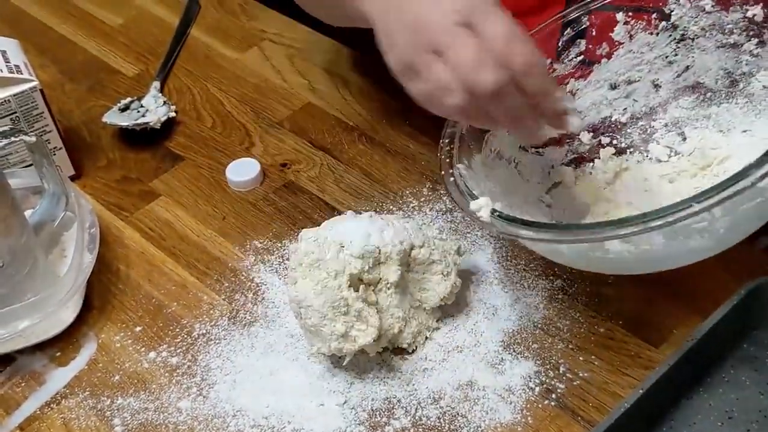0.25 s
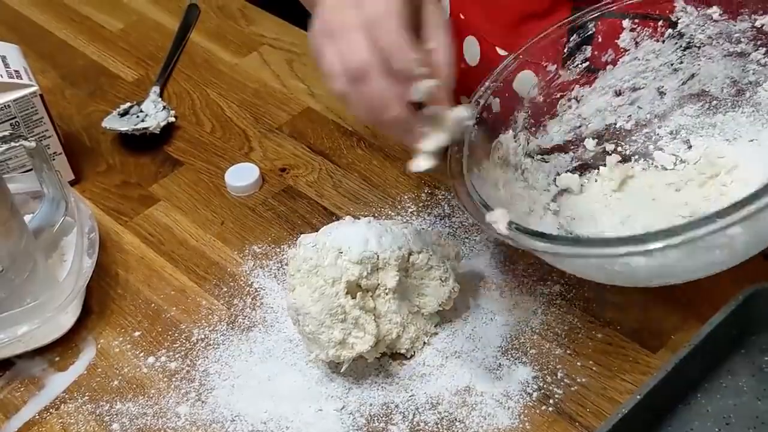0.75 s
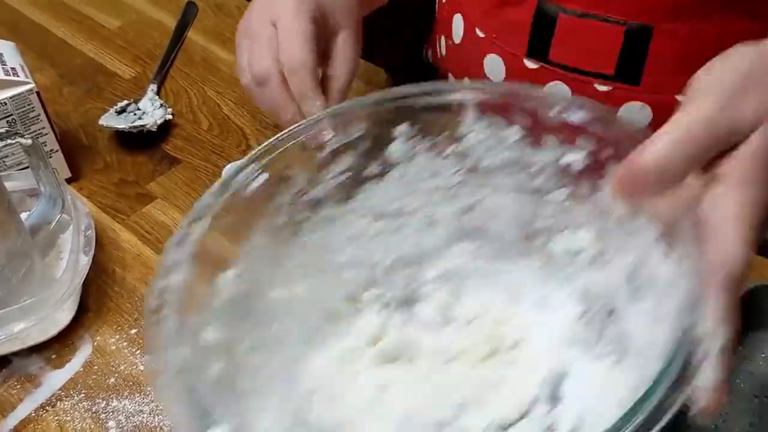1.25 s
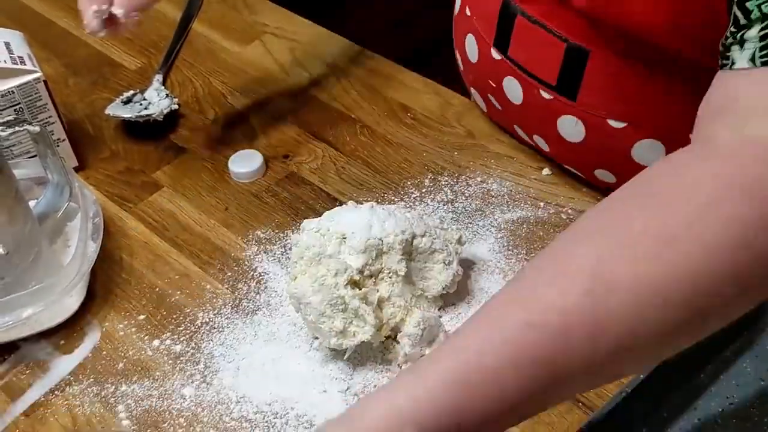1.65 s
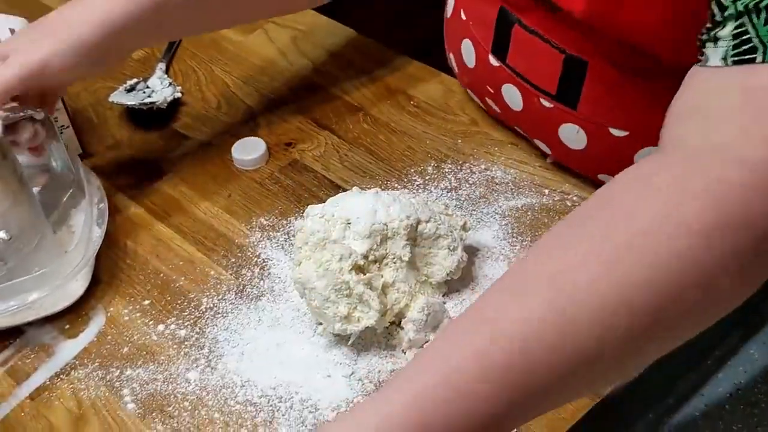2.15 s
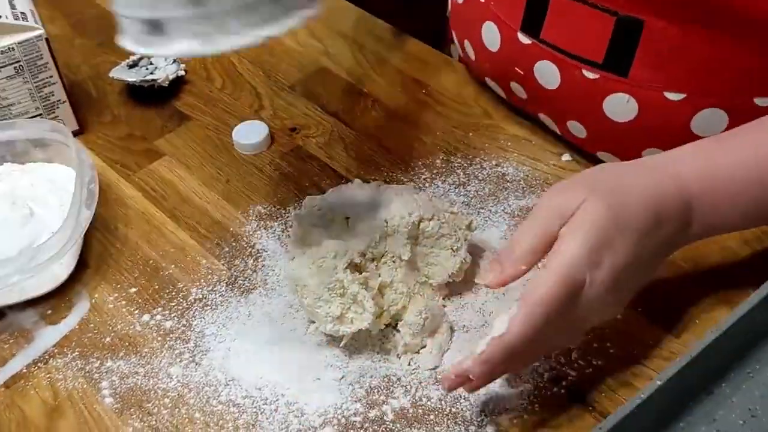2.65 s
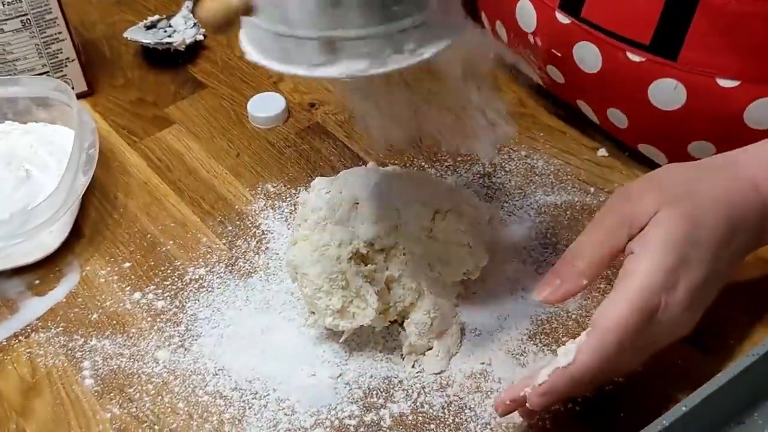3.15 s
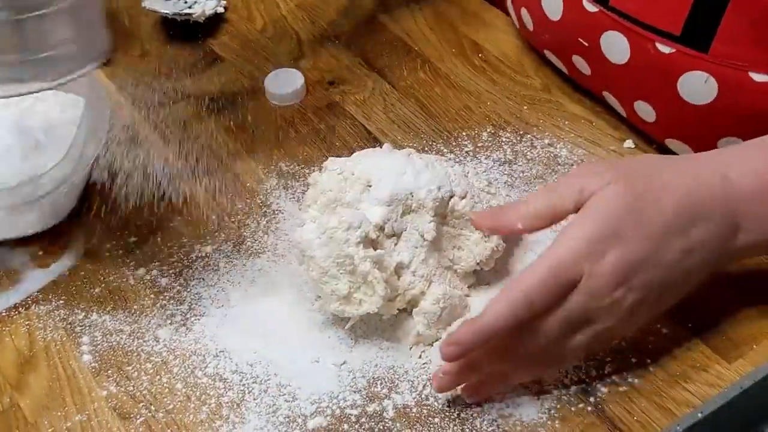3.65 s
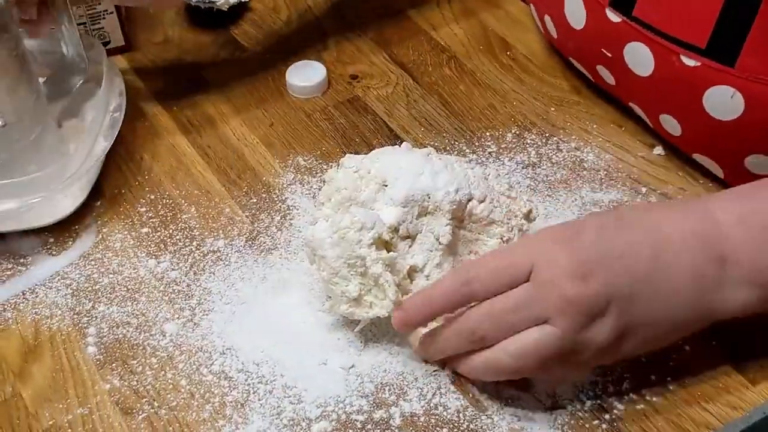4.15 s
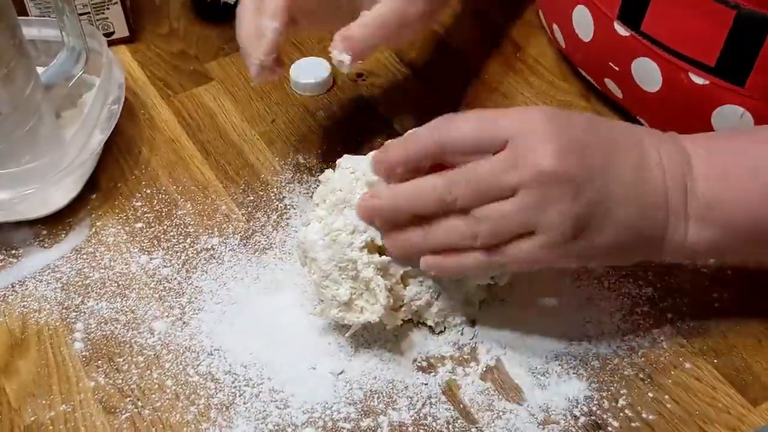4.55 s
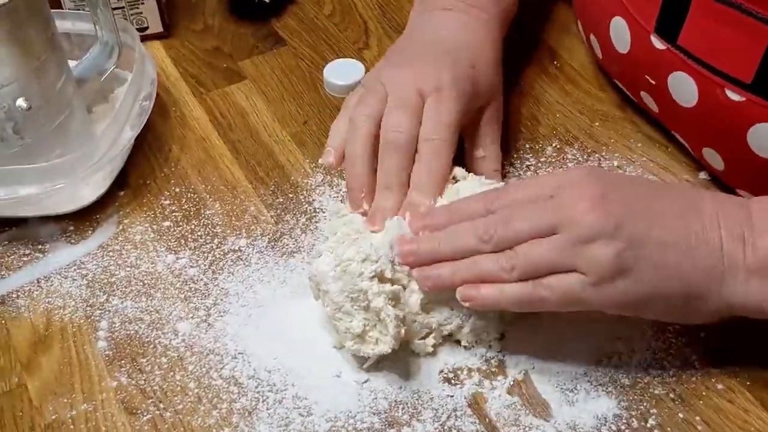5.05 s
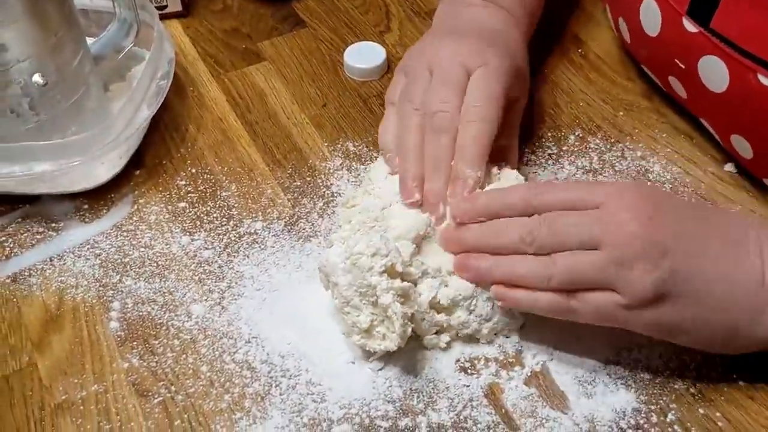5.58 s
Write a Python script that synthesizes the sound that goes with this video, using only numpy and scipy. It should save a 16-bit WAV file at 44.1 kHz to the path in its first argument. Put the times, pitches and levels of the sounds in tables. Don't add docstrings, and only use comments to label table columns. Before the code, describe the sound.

After nearly two seconds of low fridge hum, a heavy bowl thumps wood three times, a metal sifter rattles and lands, then soft dough work.

```python
import sys
import numpy as np
from scipy import signal
from scipy.fft import rfft, irfft, next_fast_len
from scipy.io import wavfile
from scipy.ndimage import uniform_filter1d, map_coordinates

SR = 44100
rng = np.random.default_rng(int(sys.argv[2]) if len(sys.argv) > 2 else 0)


def unload_audio(sound):
    columns = np.transpose(np.atleast_2d(sound))
    steps = np.round(np.clip(columns, -1, 1) * 32767)
    wavfile.write(sys.argv[1], SR, steps.astype(np.int16))


def elevation(decibels):
    levels = np.asarray(decibels, float)
    return 10 ** (levels / 20)


N = 256662

# frequency_hz, left_minus_right_db
BOWL_SIDE = [(250, -0.5), (500, 3.5), (1000, 0.5), (2000, -4.5), (4000, 0), (12000, 3.5)]


def bowl():
    # start_s, peak_db, brightness_db, foot_bounce_hz, bounce_db
    knocks = [
        (1.8818, 9, 1, 352, -1.5),
        (2.0339, 4.5, -2.5, 376, -5),
        (2.1299, 9, -3, 619.6, -6.5),
    ]
    # frequency_hz, level_db
    knock_colour = [(30, -55), (60, -21.5), (100, -14), (180, -6.5), (350, -4.5), (700, -9), (1200, -14),
                    (2000, -22.5), (3200, -32), (5000, -53), (8000, -56.5), (16000, -78)]
    # frequency_hz, level_db, t60_s
    counter = [(107.3, -9, 0.71), (135.5, -9, 0.59), (178.6, 0.5, 0.55), (247.8, -12, 0.76),
               (348.2, 5, 0.39), (448, -13, 0.52), (536, -6, 0.47), (633, -8, 0.46), (740, -10, 0.46),
               (791.7, -5, 0.27)]
    # frequency_hz, level_db, t60_s
    glass = [(5900, -67, .3), (7400, -63, .3)]
    t = np.arange(SR // 2) / SR
    out = np.zeros((2, N))
    for s, db, bright_db, foot_hz, foot_db in knocks:
        thud = elevation(foot_db - 60 * t / 0.042) * (1 - np.exp(-t / 0.0012)) * np.sin(2 * np.pi * foot_hz * t)
        ring = ringing(counter, t, uneven_db=2.2, rate=25)
        bowl_ring = ringing(glass, t, uneven_db=4, rate=60)
        tick = elevation(-43 + bright_db - 60 * t / 0.029) * rng.standard_normal(len(t))
        knock = blow(knock_colour, bright_db, length_s=0.0076, push=12)
        knock = np.pad(knock, (0, SR))[:len(t)]
        near = elevation(-21.5) * ring + bowl_ring + tick - thud - 0.27 * knock
        add(out, elevation(db) * knock, s, room_db=4.5, near=elevation(db) * near)
    out = filtered(out, lambda hz: (1j * hz / (1j * hz + 60)) ** 2)
    return ports(out, BOWL_SIDE)


def ringing(modes, t, uneven_db, rate):
    total = np.zeros(len(t))
    for hz, db, t60 in modes:
        level_db = db - 60 * t / t60 + uneven_db * wobble(rate, count=len(t))
        total += elevation(level_db) * np.sin(2 * np.pi * hz * t)
    return total


def blow(colour, bright_db, length_s, push):
    t = np.arange(SR // 4) / SR
    x = rng.standard_normal(len(t)) * elevation(-60 * t / length_s) * (1 - np.exp(-t / 0.00029))
    x[round(.0008 * SR)] -= push
    tilt = [(1000, 0.003), (8000, bright_db)]
    x = filtered(x, lambda hz: causal(elevation(along(colour, hz) + along(tilt, hz))))
    return x / np.abs(x).max()


def sifter():
    # start_s, peak_db, brightness_db, rebound_db (unheard),
    # favoured_mode_hz
    drags = [
        (2.803, -18, -11.5, -22, 4584),
        (2.852, -14.5, -11.5, -10.5, 3380),
        (2.953, -17.5, -14, -11, 3110),
        (3.186, -23.5, -21.5, -11.5, 2334),
        (3.674, -32.5, -16, -7, 1950),
        (3.477, -27.5, -26, -6.5, 4780),
        (3.57, -28.5, -15.5, -25, 1960),
    ]
    # start_s, peak_db, brightness_db, rebound_db (unheard),
    # favoured_mode_hz
    flicks = [(2.747, -43.5, -13.5, -22, 4482), (2.82, -34.5, -14.5, -15, 4600),
              (2.944, -29, -18.5, -14, 4550), (3.073, -34, -25.5, -19, 2090),
              (3.09, -29.5, -34, -18.5, 2060), (3.104, -30, -18.5, -21, 2090),
              (3.262, -17, -13.5, -9, 3080), (3.286, -28.5, -17.5, -2, 2987),
              (3.635, -25, -20.5, -4.5, 1930), (3.386, -26.5, -21.5, -2, 3630),
              (3.176, -32, -17.5, -4, 2406), (3.274, -25.5, -13, -3, 4970), (3.487, -28, -19.5, -9, 2007),
              (3.829, -25, -15.5, -35.5, 4450), (3.872, -38.5, -24, -19.5, 1960),
              (3.923, -32, -18.5, -11, 2042), (4.001, -40, -21, -18.5, 5120)]
    # start_s, peak_db, brightness_db, room_db
    landing = [
        (4.184, -14.5, 5, 2),
        (4.206, -16, 0, 6.5),
        (4.229, -9.5, 0, -7.5),
        (4.243, -22.5, -15.5, -1),
        (4.379, -41.5, 2, 8.5),
    ]
    # frequency_hz, level_db
    landing_colour = [(150, -36), (250, -4.5), (468, -11.5), (519, -7.5), (748, -3), (1020, -11.5),
                      (1200, -5), (1350, -13), (3230, -14.5), (16000, -39)]
    # frequency_hz, left_minus_right_db
    tin_side = [(500, -0.5), (1000, -0.5), (2000, -12.5), (4000, -4.5), (8000, 4.5), (12000, 1.5)]
    lead_s = .007
    strike_rattle_s = 0.037
    flight_s, flight_s_per_db = 0.0071, 1.3
    t = np.arange(SR // 8) / SR - lead_s
    out = np.zeros((2, N))
    dragged = contact(t + lead_s, -8.5, rattle_s=0.038, rise_s=0.0023)
    dragged = dragged + contact(t, 0, strike_rattle_s, rise_s=.0017)
    flicked = contact(t, 0, strike_rattle_s, rise_s=0.00037)
    strikes = [(dragged, row) for row in drags] + [(flicked, row) for row in flicks]
    for strike, (s, db, bright_db, rebound_db, grip_hz) in strikes:
        since_rebound = t - flight_s + flight_s_per_db * rebound_db
        rebound = contact(since_rebound, rebound_db, rattle_s=0.12, rise_s=0.0011)
        x = tinned(strike, grip_hz, bright_db) + tinned(rebound, 2020, bright_db + 3)
        add(out, elevation(db) * x / np.abs(x).max(), s - lead_s, room_db=-6.0)
    for s, db, bright_db, room_db in landing:
        add(out, elevation(db) * blow(landing_colour, bright_db, length_s=0.0222, push=2.8), s, room_db)
    return ports(out, tin_side)


def contact(t, db, rattle_s, rise_s):
    after = np.maximum(t, 0)
    return elevation(db - 60 * after / max(rattle_s, .004)) * (1 - np.exp(-after / max(rise_s, .0002)))


def tinned(envelope, grip_hz, bright_db):
    # frequency_hz, width_hz, level_db
    tin_modes = [(930, 126.5, 4.5), (2011, 87, -0.5), (3005, 240, 0), (3600, 35, -11.5), (4540, 260, 3),
                 (5740, 110, -40.5), (7020, 220, 1), (9020, 65, 1)]
    # frequency_hz, level_db
    tin_colour = [(290, -53), (500, -18), (933, -9.5), (1400, -4.5), (2010, -5), (2460, -6), (3060, -3),
                  (5550, -14.5), (14700, -18.5), (16000, -32)]
    modes = tin_modes + np.outer(rng.normal(-3, 3, len(tin_modes)), [0, 0, 1])
    modes = np.vstack([modes, (grip_hz, 130, 3)])
    tilt = [(4500, 0), (7000, bright_db + 19.0)]

    def tin(hz):
        peaks = sum(elevation(level + 4.0) / (1 + ((hz - c) / w) ** 2) for c, w, level in modes)
        return elevation(along(tin_colour, hz)) * (1 + peaks)

    grit = elevation(3.3 * rng.standard_normal(len(envelope) // 20 + 1)).repeat(20)[:len(envelope)]
    x = rng.standard_normal(len(envelope)) * grit * envelope
    return filtered(x, lambda hz: causal(tin(hz) * elevation(along(tilt, hz))))


def board():
    # start_s, level_db, pitch_hz, t60_s
    pushes = [(4.187, -15.5, 183.6, 0.12), (4.203, -16.5, 136, 0.12), (4.24, -11.5, 146, 0.059),
              (4.26, -28.5, 95, 0.17), (4.19, -28.5, 270, 0.14), (4.232, -35.5, 620, 0.0594),
              (2.9, -54.5, 80, 0.14), (1.4, -48.5, 230, 0.32), (1.56, -53, 110, 0.12),
              (2.1, -36.5, 410, .03), (2.84, -40, 250, 0.17), (5.58, -39.5, 105, 0.053),
              (5.689, -39, 100, 0.184), (5.66, -47.5, 92, 0.17), (3.7, -54, 500, 0.26)]
    t = np.arange(SR // 2) / SR
    out = np.zeros((2, N))
    for s, db, hz, t60 in pushes:
        envelope = elevation(db - 60 * t / t60) * (1 - np.exp(-t / 0.0023))
        add(out, envelope * np.sin(2 * np.pi * hz * t), s, room_db=-13)
    return ports(out, BOWL_SIDE)


def palms():
    # start_s, length_s, level_db
    strokes = [
        (4.33, 0.56, -60.5),
        (4.58, 0.418, -68),
        (5.73, 0.11, -57.5),
        (5.76, 0.12, -53),
    ]
    # frequency_hz, level_db
    rub_colour = [(300, -44), (700, -3), (950, -3), (1500, -7.5), (2200, -6.5), (3500, -13.5), (4300, -15),
                  (6500, -26.5), (16000, -27)]
    return swells(strokes, rise=0.13) * elevation(2 * wobble(70)) * rush(rub_colour, patchy_db=1.5)


def kitchen():
    # time_s, lift_db
    settle = [(0, 2.8), (.45, 1.5), (.95, 5), (1.85, 6.5), (2.6, 9), (3.8, 10), (4.1, 8.5), (4.4, 10.5),
              (5.82, 10.5)]
    # start_s, length_s, level_db
    stirs = [
        (1.25, 1.8, -74),
        (2.62, 1.9, -64.5),
        (4.25, 0.68, -66.5),
    ]
    # frequency_hz, level_db
    fridge = [(108, -69), (142, -73), (240, -71), (320, -67), (360, -70), (398, -80), (480, -81),
              (530, -80), (671, -81)]
    # frequency_hz, level_db
    rumble_colour = [(5, -7.5), (50, -1), (100, -1.5), (200, -4), (235, -8.5), (260, -13), (330, -7.5),
                     (400, -11), (580, -14), (780, -13), (900, -16), (1300, -37), (2200, -120)]
    # frequency_hz, level_db
    air_colour = [(350, -15), (600, -23), (815, -11), (1210, -10.5), (2060, -9.5), (5850, -23),
                  (9000, -30.5), (11700, -62), (19800, -120)]
    # frequency_hz, level_db
    hiss_colour = [(3530, -40.5), (6000, -33), (7080, -3), (7950, -15), (9940, -3), (11900, 3.5),
                   (13300, -2.5), (15500, -7), (16100, -31.5)]
    rumble_db, air_db, hiss_db = -65, -76.5, -77
    t = np.arange(N) / SR
    up_db = np.interp(t, *np.transpose(settle))
    stir = swells(stirs, rise=.15)
    hum = np.zeros(N)
    for hz, db in fridge:
        hum += elevation(db - 1 + 2 * wobble(5)) * np.sin(2 * np.pi * hz * t + .8 * wobble(5))
    hum *= elevation((rumble_db + up_db + 61) / 2)
    rumble = elevation(rumble_db + up_db + 0.69 * wobble(3.1)) * rush(rumble_colour, patchy_db=1.4)
    hiss_level = np.hypot(elevation(hiss_db + 0.33 * up_db), elevation(-8.5) * stir)
    hiss = hiss_level * elevation(2.5) * rush(hiss_colour, patchy_db=1.5)
    air_level = np.hypot(elevation(air_db + 0.49 * up_db), stir)
    air = air_level * elevation(5.5) * rush(air_colour, patchy_db=1)
    return rumble + hum + air + hiss


def swells(rows, rise):
    u = np.array([(np.arange(N) / SR - s) / length for s, length, db in rows])
    shape = np.clip(np.minimum(u / rise, (1 - u) / (1 - rise)), 0, 1)
    power = elevation(np.array(rows)[:, 2]) ** 2
    return np.sqrt(power @ np.sin(np.pi / 2 * shape) ** 2)


def rush(spectrum, patchy_db):
    z = signal.stft(rng.standard_normal((2, N)), nperseg=512)[2]
    field = uniform_filter1d(rng.standard_normal(z.shape[1:]), size=6, axis=0)
    field = uniform_filter1d(field, size=14, axis=1)
    pair = signal.istft(z * elevation(patchy_db * unit(field)), nperseg=512)[1][:, :N]
    pair = ports(diffuse(pair), [(100, 0.45), (5000, 0.32)])
    return unit(filtered(pair, lambda hz: elevation(along(spectrum, hz))))


def add(out, x, s, room_db, near=0):
    # frequency_hz, t60_s
    room_decay = [(100, 0.51), (300, 0.4), (1000, 0.36), (3000, 0.37), (6000, 0.324), (12000, 0.3906)]
    tail_s = .4
    noise = diffuse(rng.standard_normal((2, round(tail_s * SR))))
    hz, t, z = signal.stft(noise, SR, nperseg=256)
    tail = signal.istft(z * elevation(-60 * t / along(room_decay, hz)[:, None]), SR, nperseg=256)[1]
    tail = np.pad(tail / np.linalg.norm(tail[0]), ((0, 0), (round(.002 * SR), 0)))
    wet = elevation(room_db) * signal.fftconvolve(x[None], tail, axes=1)
    wet[:, :len(x)] += x + near
    start = round(s * SR)
    out[:, start:start + wet.shape[1]] += wet[:, :N - start]


def diffuse(pair):
    # frequency_hz, likeness (0-1)
    alike = [(60, 0.63), (250, 0.97), (500, 0.74), (1000, 0.618), (2000, 0.21), (8000, 0.033)]

    def mid_side(hz):
        turn = np.arccos(np.clip(along(alike, hz), 0, 1)) / 2
        return np.array([np.cos(turn), np.sin(turn)])

    mid, side = filtered(pair, mid_side)
    return np.array([mid + side, mid - side])


def ports(pair, side):
    lead_s = 0.0002008
    turn = np.array([[.5], [-.5]])
    return filtered(pair, lambda hz: elevation(turn * along(side, hz)) * np.exp(2j * np.pi * hz * turn * lead_s))


def unit(x):
    return x / np.sqrt(np.mean(x ** 2) + 1e-20)


def along(points, hz):
    f, v = np.transpose(points)
    return np.interp(np.log(hz + 1), np.log(f + 1), v)


def wobble(rate, count=N):
    knots = rng.standard_normal(int(count * rate / SR) + 4)
    return map_coordinates(knots, [np.arange(count) * rate / SR])


def filtered(x, response):
    m = next_fast_len(x.shape[-1] + 4096)
    return irfft(rfft(x, m) * response(np.fft.rfftfreq(m, 1 / SR)), m)[..., :x.shape[-1]]


def causal(gain):
    cep = irfft(np.log(np.maximum(gain, 1e-6)))
    half = len(cep) // 2
    return np.exp(rfft(np.r_[cep[0], 2 * cep[1:half], np.zeros(len(cep) - half)]))


def riding(x):
    lift_db, spell_s, spell_floor_db, spell_span_db = 6, .27, -29, 7
    press, knee_db, press_s = 0.47, -31.5, 0.035
    power = np.mean(x ** 2, axis=0)
    span = round(spell_s * SR)
    spell = np.abs(uniform_filter1d(power, size=span, origin=(span - 1) // 2))
    spell_db = 10 * np.log10(spell + 1e-12)
    keep = np.exp(-1 / (press_s * SR))
    now_db = 10 * np.log10(signal.lfilter([1 - keep], [1, -keep], power) + 1e-12)
    share = np.clip((spell_db - spell_floor_db) / spell_span_db, 0, 1)
    return share * (lift_db - press * np.maximum(now_db - knee_db, 0))


def scene():
    return bowl() + sifter() + board() + palms() + kitchen()


def top_cut(x):
    return signal.sosfilt(signal.butter(12, 16290, fs=SR, output="sos"), x)


def record(dry):
    x = filtered(dry, lambda hz: 1j * hz / (1j * hz + 4))
    x = x * elevation(riding(x))
    x = x / (1 + np.abs(x / .99) ** 16) ** (1 / 16)
    return top_cut(x)


dry = scene()
out = record(dry)
unload_audio(out)
```